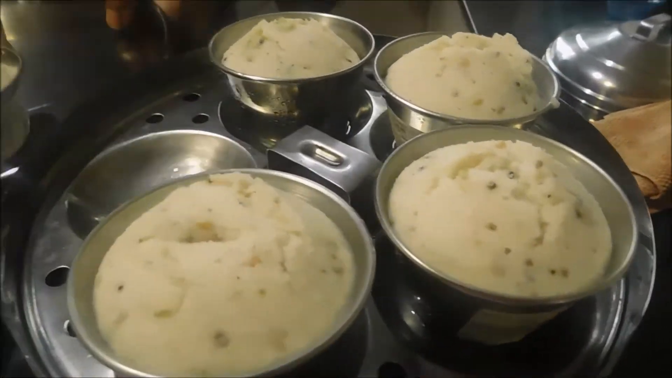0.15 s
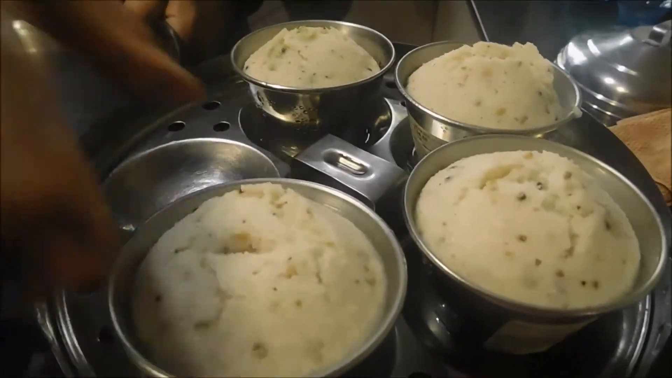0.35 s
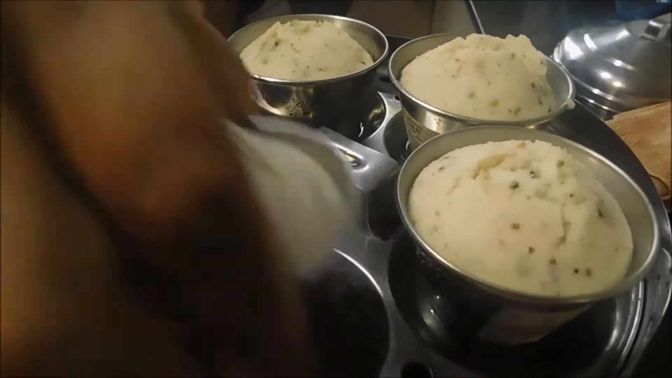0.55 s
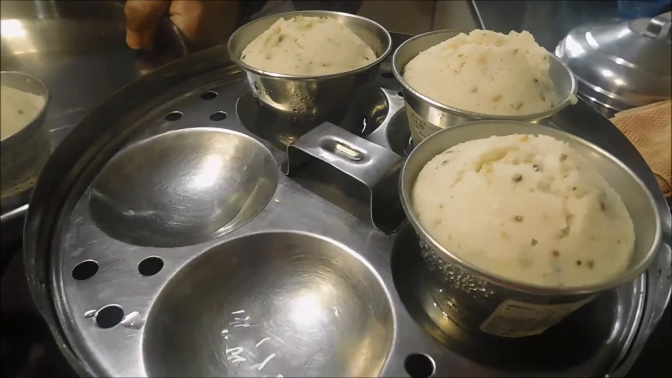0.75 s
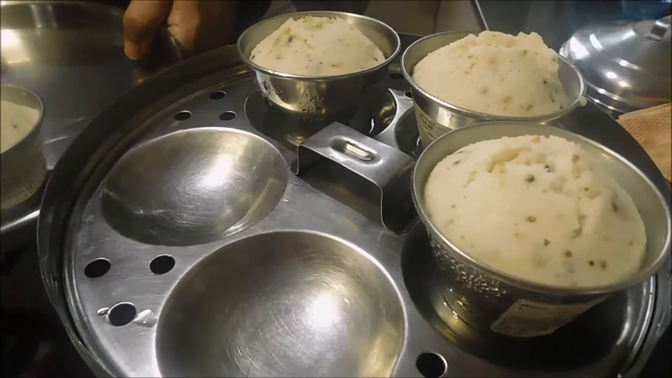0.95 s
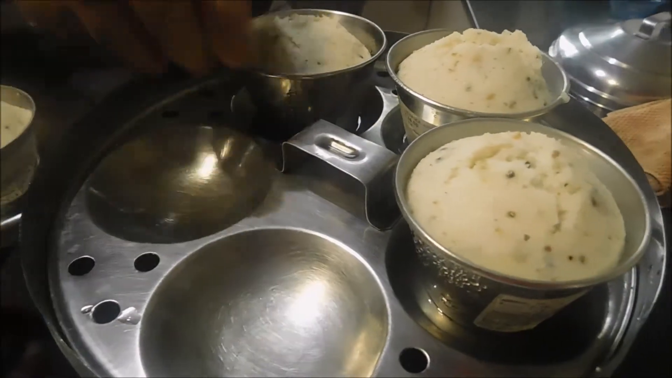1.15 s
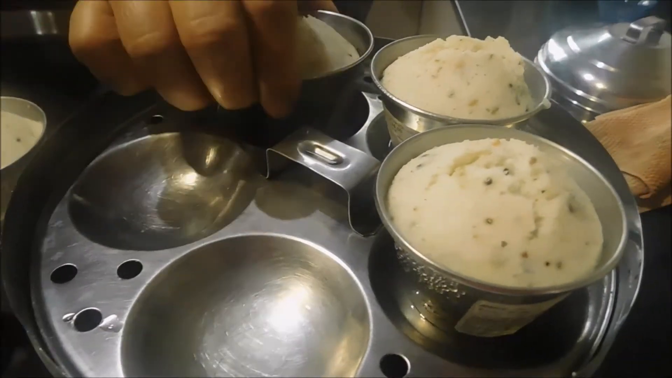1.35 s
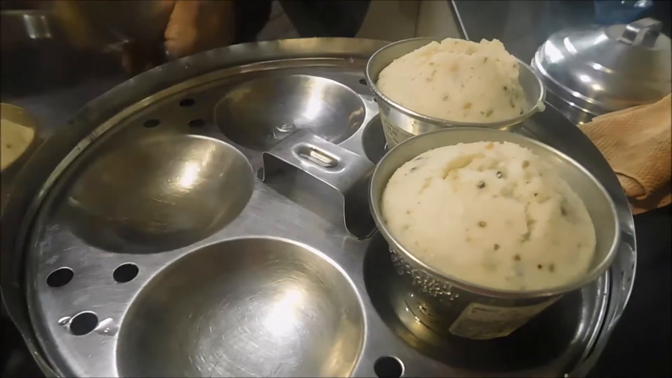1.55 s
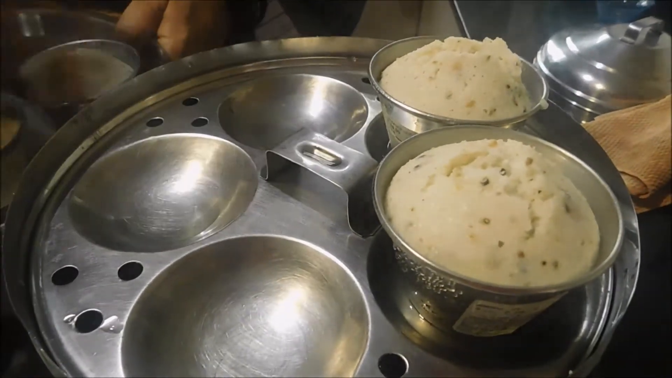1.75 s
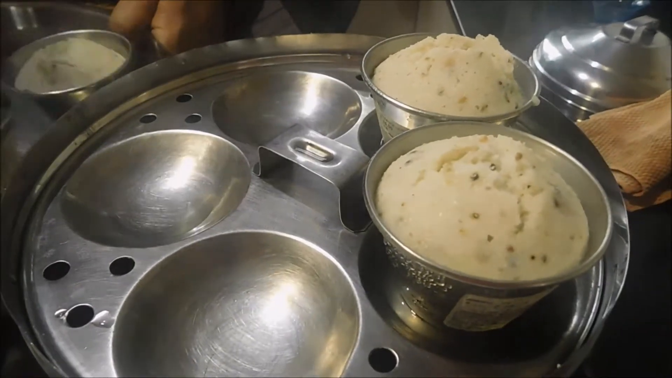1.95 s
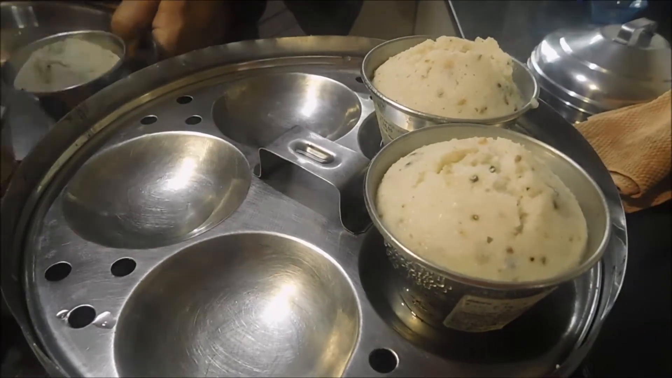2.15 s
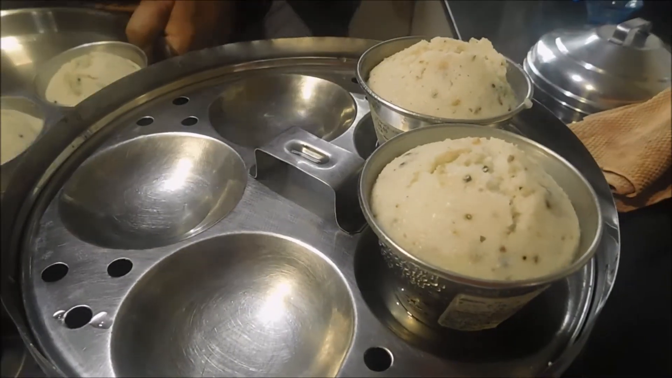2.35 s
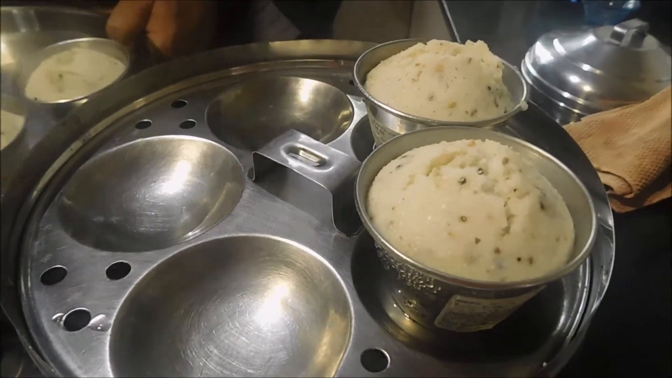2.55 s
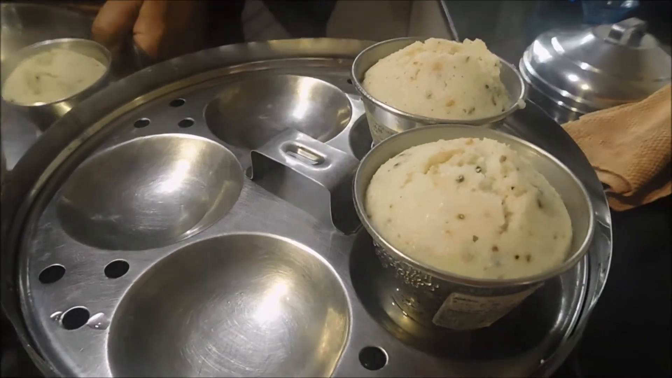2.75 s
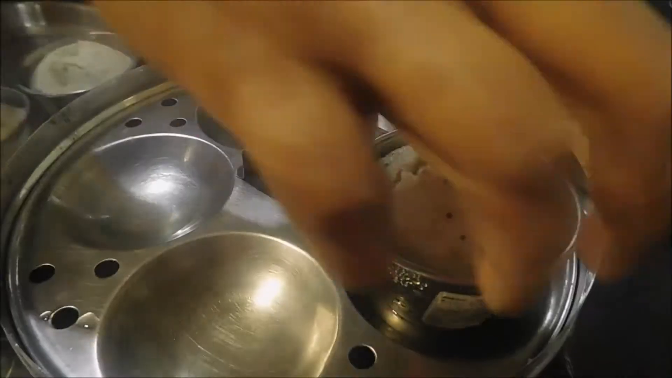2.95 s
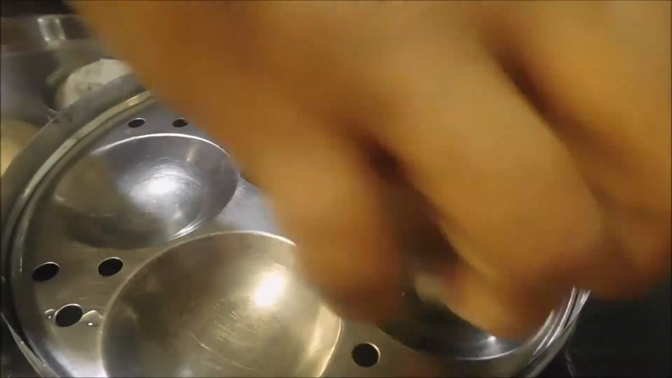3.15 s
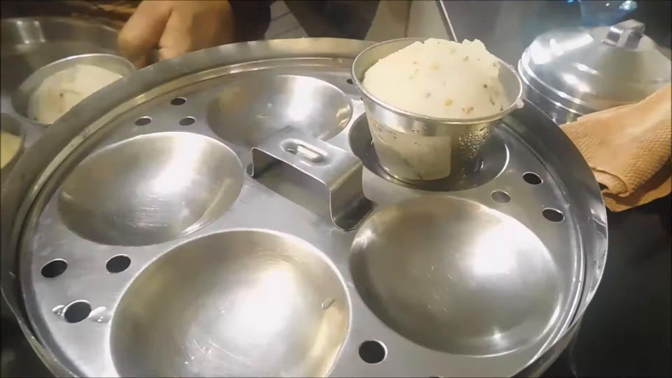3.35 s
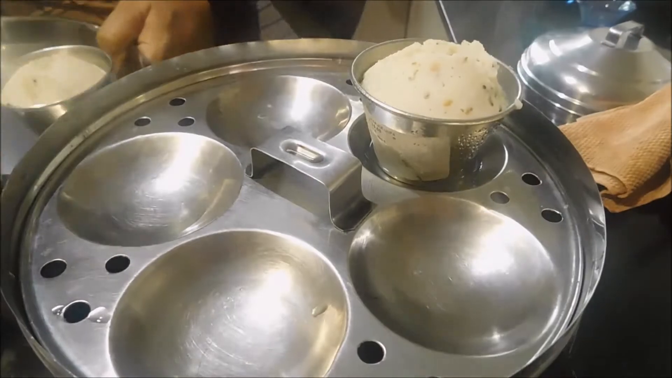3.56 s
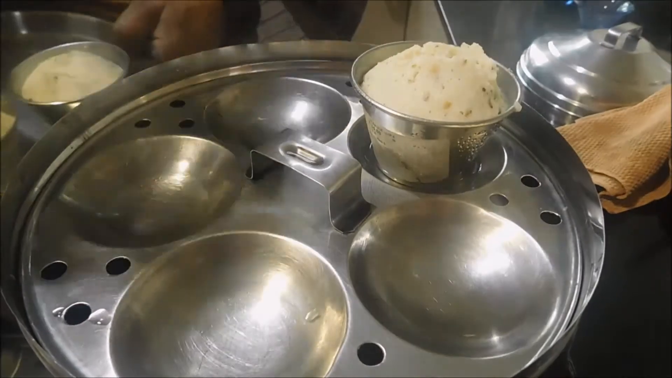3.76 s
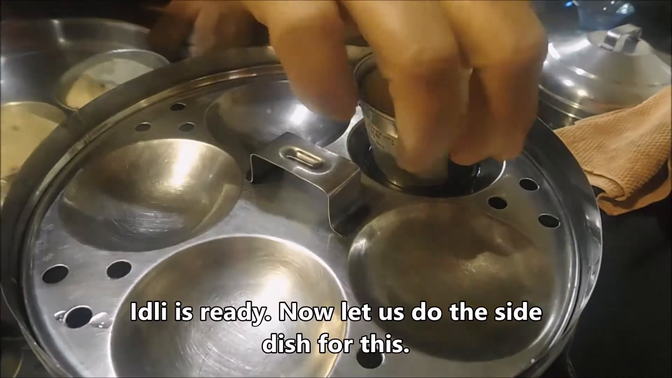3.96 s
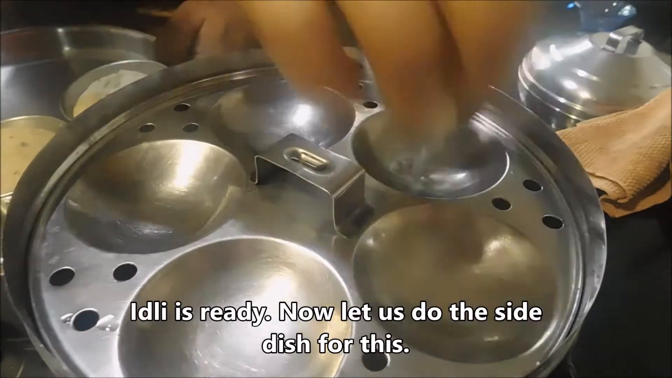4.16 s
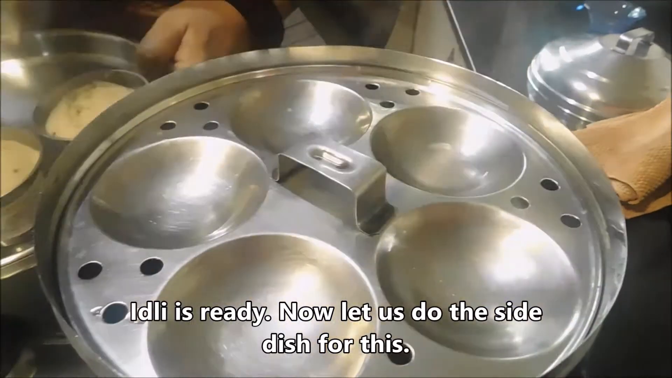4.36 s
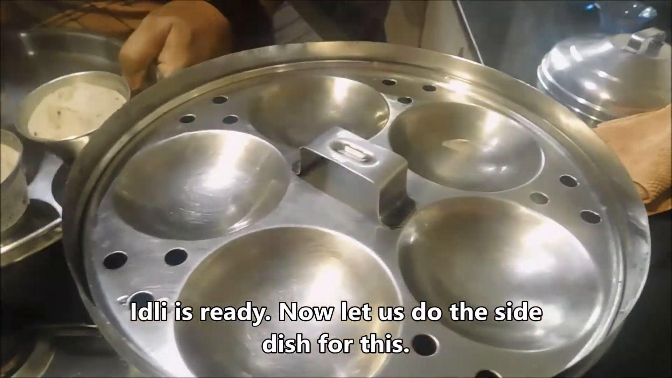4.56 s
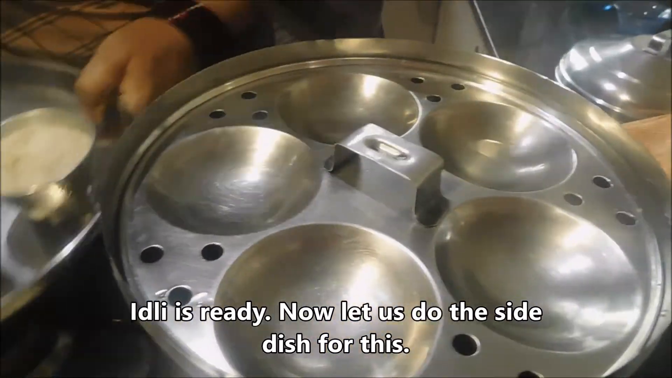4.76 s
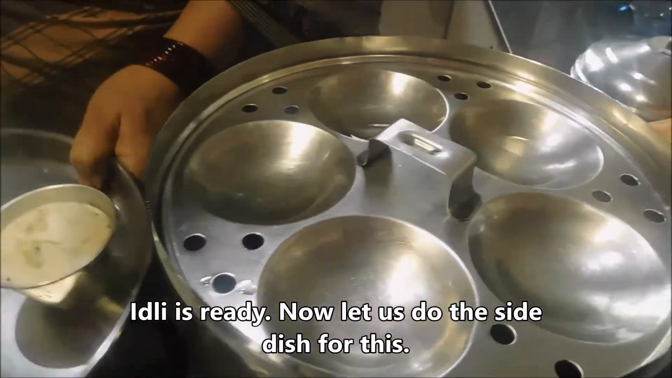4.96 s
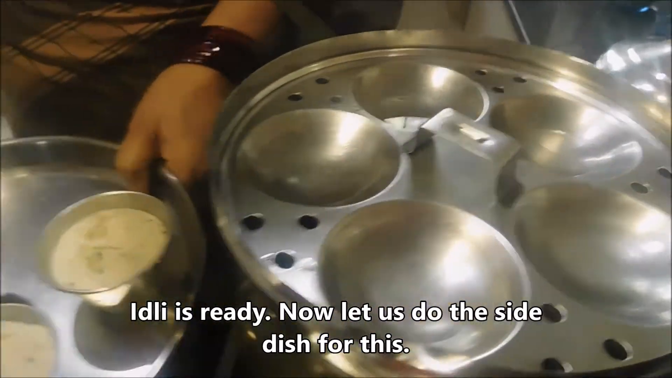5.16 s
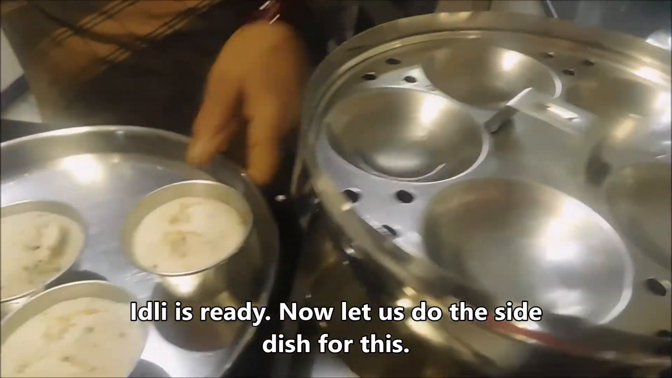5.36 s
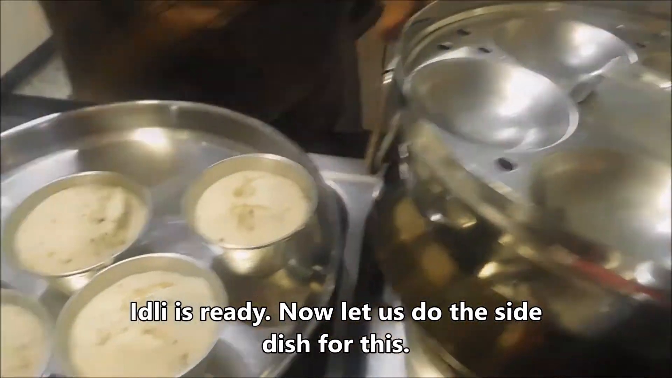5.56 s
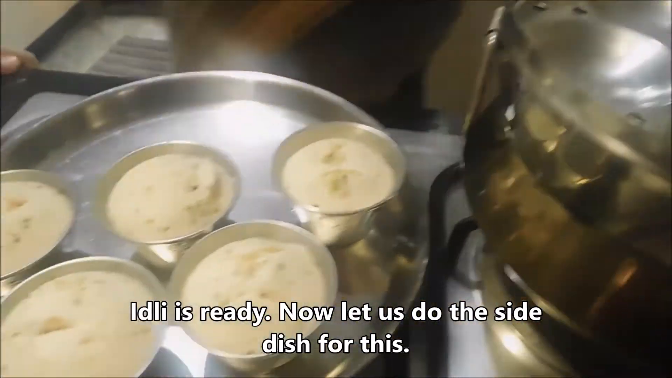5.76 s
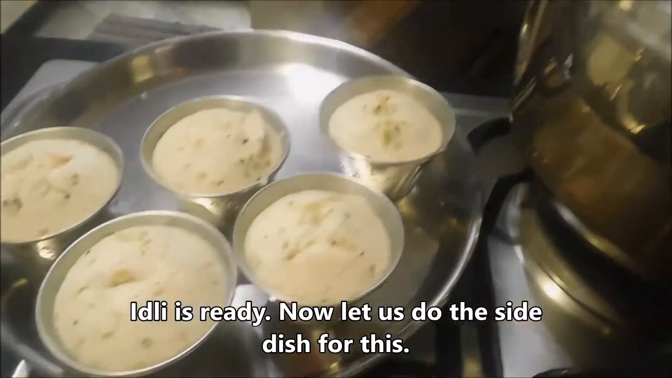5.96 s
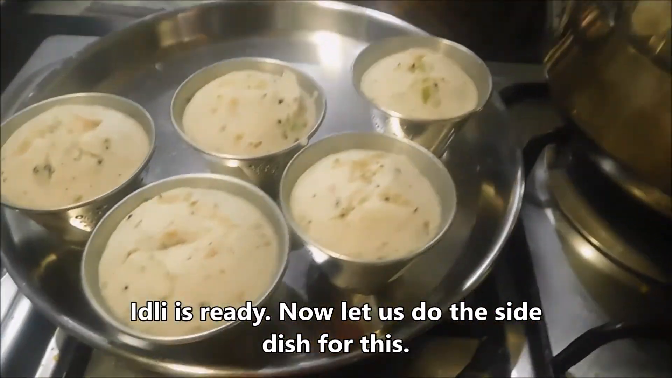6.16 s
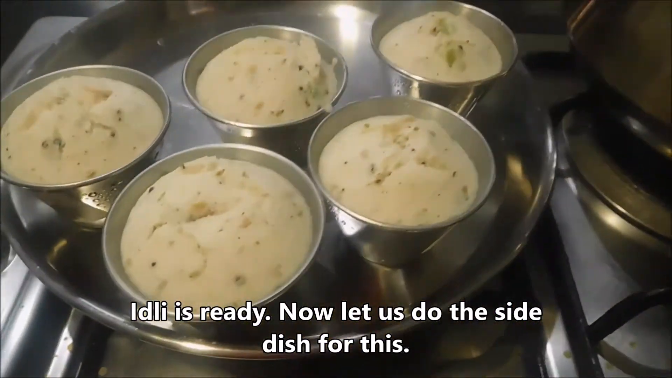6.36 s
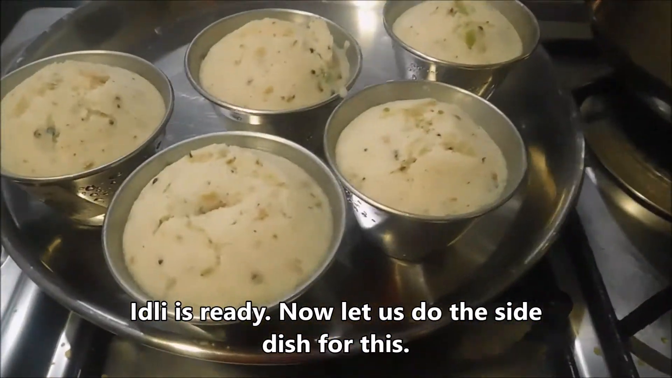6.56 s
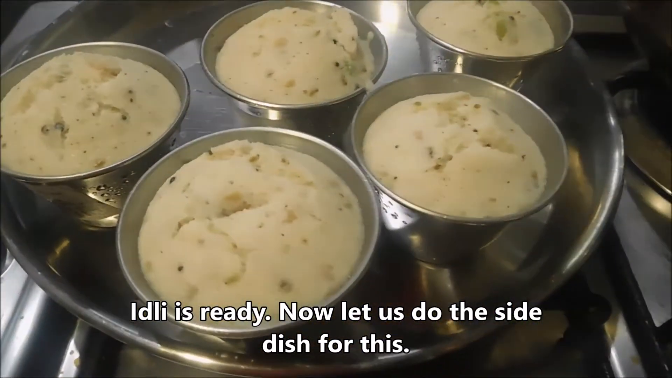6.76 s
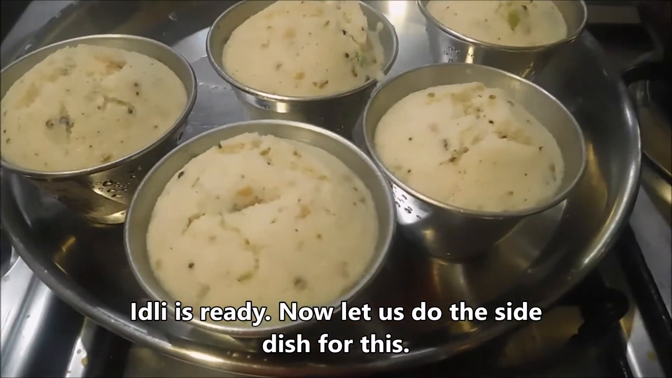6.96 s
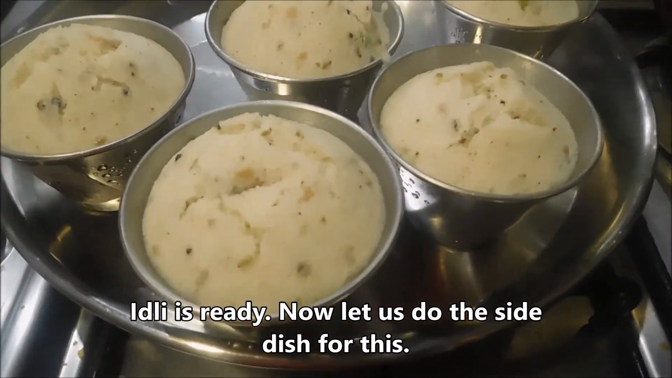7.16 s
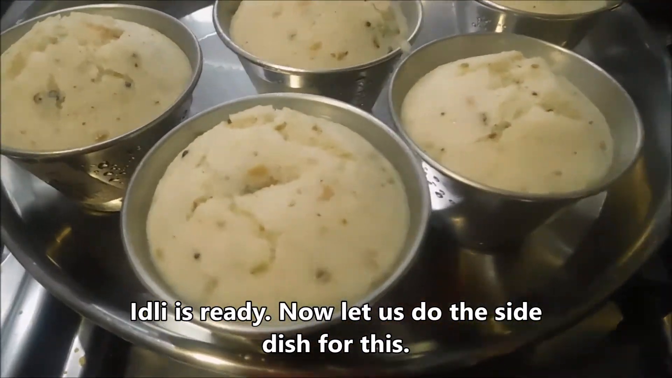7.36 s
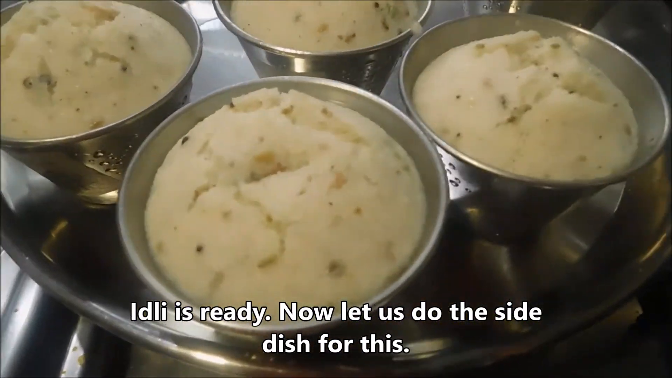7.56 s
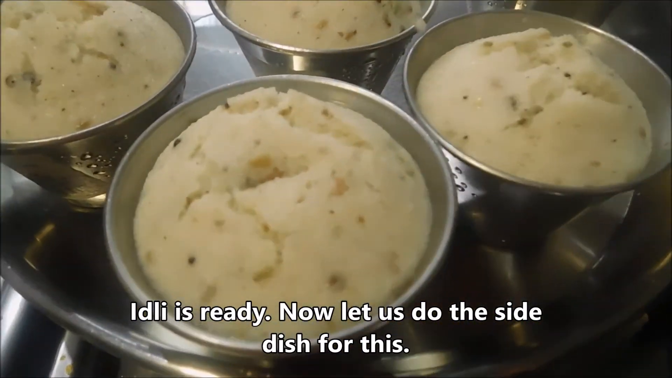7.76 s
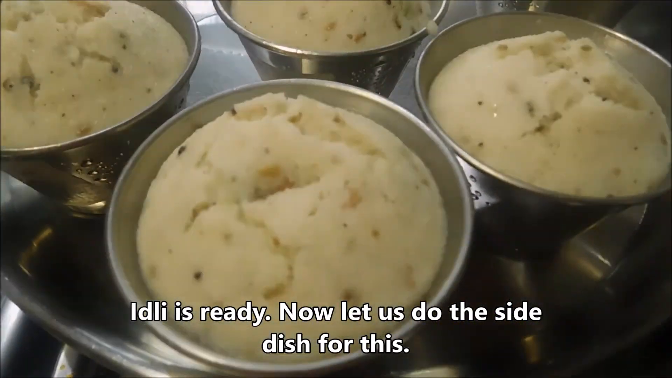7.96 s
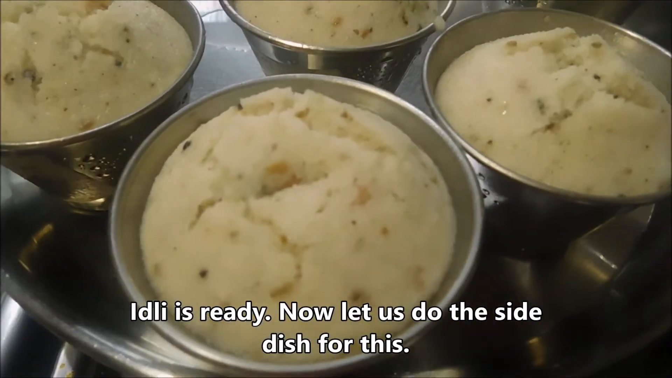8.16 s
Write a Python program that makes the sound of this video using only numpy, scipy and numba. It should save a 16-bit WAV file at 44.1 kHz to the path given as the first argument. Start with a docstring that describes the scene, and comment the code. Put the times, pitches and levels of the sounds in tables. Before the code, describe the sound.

Filled small steel cups clank one after another onto a steel tray, light scrapes between, then the tray knocks aside over faint stove hiss and ticks.

```python
"""By a kitchen stove: small steel cups full of steamed cake clank onto a steel tray, close to a phone.
Each contact is a few short-lived modes, a dense wash and a crack, re-struck as the cup rocks. Cups also
leave a steamer plate, the full tray knocks as it is dragged aside, and small ticks ring the pot's modes.
Behind are burner hiss (coloured noise) and simmering (short pings), then faint rubs and sliding tones.
Two microphone ports a few centimetres apart hear it all."""
import sys
import numpy as np
from scipy import signal
from scipy.fft import rfft, irfft, next_fast_len
from scipy.io import wavfile
from scipy.ndimage import uniform_filter1d
from numba import njit

SR = 44100
rng = np.random.default_rng(int(sys.argv[2]) if len(sys.argv) > 2 else 0)


def to_wav(s):
    """Save 16-bit WAV."""
    ch = np.atleast_2d(s).T  # columns
    pcm = np.round(np.clip(ch, -1, 1) * 32767)  # PCM
    wavfile.write(sys.argv[1], SR, pcm.astype(np.int16))


N = 362502

TOP_HZ = 15800  # hiss and rubs end here, contacts fall to a faint floor
LEAD_S = .004  # lead before each contact that holds the ringing of the zero-phase band filters
BLOW_SAMPLES = 8192
PORT = np.array([[1], [-1]])  # sign of each port about the midpoint


def undb(db):
    """Gain of a dB value."""
    return 10 ** (np.asarray(db) / 20)


def on_log(hz, table):
    """Read a (Hz, value) table on a log axis."""
    f, v = np.transpose(table)
    return np.interp(np.log(hz + 1), np.log(f + 1), v)


def over_time(table):
    """Columns of a curve table, one value a sample."""
    s, *columns = np.transpose(table)
    return [np.interp(np.arange(N) / SR, s, c) for c in columns]


def walk(rate):
    """Random levels held 1 / rate s and slewed twice; spread near 1."""
    hold = int(SR / rate)
    held = np.repeat(rng.standard_normal(N // hold + 1), hold)
    slewed = uniform_filter1d(uniform_filter1d(held, hold), hold)
    return 1.36 * slewed[:N]


def add(out, sound, s):
    """Mix a sound in at s seconds."""
    i = int(s * SR)
    part = sound[:, :N - i]
    out[:, i:i + part.shape[1]] += part


@njit
def ring(poles, gains, n):
    """Sum of decaying modes, each with its own gain and phase at the two ports."""
    out = np.zeros((2, n))
    for m in range(len(poles)):
        z = 1 + 0j
        for i in range(n):
            out[0, i] += (gains[0, m] * z).imag
            out[1, i] += (gains[1, m] * z).imag
            z *= poles[m]
            if abs(z.real) + abs(z.imag) < 1e-4:
                break
    return out


def clear_modes(modes, spot_hz, second_spot_hz, ring_factor, lag):
    """Struck sheet: modes with an antinode under the blow ring louder; the peak is set to 1."""
    hz, db, t60 = np.transpose(modes)
    chance = rng.standard_normal((3, len(hz)))
    spots_hz = np.array([[spot_hz], [second_spot_hz]])
    near = np.exp(-(np.log(hz / spots_hz) / 0.058) ** 2)
    db = db + 9 * near[0] + 6 * near[1] + 2 * chance[0]
    hz = hz * (1 + .0015 * chance[1])
    # the ports hear high modes from different parts of the sheet
    apart = np.pi * hz * lag / SR + np.clip(hz / 9000, 0, 1.5) * chance[2]
    gains = undb(db) * np.exp(-1j * PORT * apart) * rng.choice([-1, 1], len(hz))
    decay = np.log(1000) / (t60 * ring_factor * SR)
    tones = ring(np.exp(2j * np.pi * hz / SR - decay), gains, BLOW_SAMPLES)
    return tones / np.abs(tones).max()


def dense_wash(t, f, t60):
    """Weak modes too many to tell apart, as decaying noise; the high ones fade sooner."""
    mid, side = rfft(rng.standard_normal((2, BLOW_SAMPLES)))
    crowd = mid + np.clip(f / 6500, 0, 1) * side * PORT
    low = 1 / (1 + (f / 4500) ** 2)
    fade = np.log(1000) * t / t60
    return irfft(crowd * low) * np.exp(-fade) + 0.66 * irfft(crowd * (1 - low)) * np.exp(-1.3 * fade)


def rocking(chatter_db, chatter_s):
    """A first contact of 1, then small uneven bounces that die away."""
    when, size = rng.random((2, 8))
    knocks = np.zeros(BLOW_SAMPLES)
    places = (when * np.clip(chatter_s, .001, .06) * SR).astype(int)
    knocks[places] = undb(chatter_db - 18.7 * when) * (0.65 + size)
    knocks[0] = 1
    return np.roll(knocks, int(LEAD_S * SR))


# Edges between thud, hollow, body, edge and sheen. Each entry: frequency in Hz.
BAND_EDGES_HZ = (600, 1100, 2500, 6000)


def set_bands(whole, f, band_db):
    """Split a contact's spectrum into five bands and set the peak of each in dB."""
    lowpasses = [1 / (1 + (f / edge) ** 8) for edge in BAND_EDGES_HZ]
    under = np.array([0 * f] + lowpasses + [1 + 0 * f])
    bands = irfft(whole * np.diff(under, axis=0)[:, None])
    bands /= np.abs(bands).max(axis=(1, 2), keepdims=True)
    return np.tensordot(undb(band_db), bands, axes=1)


# how much of the weight reaches thud and hollow, and of the brightness edge and sheen
WEIGHT_SHARE, BRIGHT_SHARE = (0.72, 1.06), (0.84, 1.09)
SOFTENING = 0.27  # dB of crack lost per dB of weight: a heavy, flat landing is a softer contact


def blow(row, modes, colour_db, dense_db, dense_t60, crack_db, chatter_db, chatter_s, lag, low_hz):
    """One contact: modes, wash and crack, re-struck by rocking; lag in samples, t60 before ring_factor.

    colour_db is a plain blow re its body: thud, hollow, edge, sheen; low_hz is where the lows roll off.
    """
    _, body_db, weight_db, bright_db, spot_hz, second_spot_hz, ring_factor = row
    ring_factor = max(ring_factor, .05)
    t = np.arange(BLOW_SAMPLES) / SR
    f = np.arange(BLOW_SAMPLES // 2 + 1) * SR / BLOW_SAMPLES
    steel = clear_modes(modes, spot_hz, second_spot_hz, ring_factor, lag)
    steel += undb(dense_db) * dense_wash(t, f, dense_t60 * ring_factor)
    crack = rng.standard_normal(BLOW_SAMPLES) * np.exp(-t / 0.00096)
    steel += undb(crack_db - SOFTENING * weight_db) * crack
    knocks = rocking(chatter_db, chatter_s)
    # balance of the two ports over pitch
    lean_db = np.interp(np.log(f + 1), np.log([500, 4000, 8000]), [-.1, -.7, 1.1])
    whole = rfft(steel) * rfft(knocks) * undb(PORT * lean_db) / (1 + (low_hz / (f + 1)) ** 4)
    whole *= .04 + 1 / (1 + (f / TOP_HZ) ** 60)
    tilt_db = np.append(weight_db * np.array(WEIGHT_SHARE), bright_db * np.array(BRIGHT_SHARE))
    band_db = body_db + np.insert(colour_db + tilt_db, 2, 0)
    tail = np.clip((7000 - np.arange(BLOW_SAMPLES)) / 1500, 0, 1)
    return set_bands(whole, f, band_db) * tail


def blows(rows, modes, **settings):
    """Place one contact per row, its first touch at the row's start."""
    out = np.zeros((2, N))
    for row in rows:
        add(out, blow(row, modes, **settings), row[0] - LEAD_S)
    return out


# Cups landing on the tray. Each row: start in seconds, peak of the 1.1-2.5 kHz body in dB, weight that
# lifts the lows in dB, brightness that lifts the highs in dB (both before their shares), main and second
# pitch the struck spot favours in Hz, factor that scales the ring time.
SET_DOWNS = [(0.1749, -15.5, 5.5, 9.5, 1180, 3900, 0.72), (0.188, -24.5, -8, 12.5, 1176, 5260, 0.7),
             (0.2071, -17, -17, -3, 1500, 1176, 0.64), (0.2227, -26.5, -8, 8, 1480, 3720, 0.54),
             (0.9062, -17, 4, 3.5, 1300, 2180, 0.73), (0.9436, -29.5, -10, -2.5, 1650, 2190, 1.1),
             (1.7363, -16.5, 0.5, 0.5, 1440, 2500, 0.61), (1.7652, -23, -18, -11, 1400, 2470, 0.83),
             (1.7742, -22.5, -15, 3, 1490, 2520, 0.56), (2.5693, -37.5, 17.5, -6, 690, 2130, 0.48),
             (2.579, -35.5, 17, 4.5, 1650, 2690, 0.92), (2.6213, -35, 16.5, -1, 1300, 2780, 0.88),
             (2.69, -25, 12.5, 3, 1310, 2430, 0.67), (2.703, -32.5, 11, -9, 1290, 1650, 0.7),
             (3.5587, -15, 1, 3.5, 1410, 2100, 0.6), (3.571, -25.5, -6, 3, 1925, 2820, 0.7),
             (3.588, -21.5, -10, -5, 1480, 2820, 0.6), (4.554, -11, 4, 2.5, 1146, 3320, 0.63),
             (4.5962, -28.5, 14.5, 16.5, 1180, 3700, 0.46), (4.6259, -29.5, 1, 16, 1170, 3580, 0.6),
             (4.6516, -27, 2, -15, 1480, 2970, 0.69)]
# Modes of the tray. Each row: frequency in Hz, level in dB, t60 in seconds before the ring factor.
TRAY_MODES = [(430, -14, .05), (690, -6, .12), (940, -6, .12), (1060, -6, .13), (1176, 1, .17),
              (1290, -5, .14), (1483, -1, .15), (1650, -4, .13), (1925, -5, .12), (2060, -4, .14),
              (2190, -6, .13), (2430, -5, .13), (2510, -5, .13), (2820, -4, .15), (3120, -6, .13),
              (3340, -6, .13), (3720, -5, .13), (4110, -7, .12), (4370, -7, .12), (4700, -8, .12),
              (5260, -5, .13), (5500, -8, .12), (6676, -7, .14), (7230, -10, .11), (8300, -8, .11),
              (9500, -9, .12), (10600, -10, .1), (11300, -7, .12), (12700, -13, .1), (14800, -13, .1)]


def set_downs():
    """Filled cups meet the steel tray; filling and fingers damp each ring to a short clank."""
    return blows(SET_DOWNS, TRAY_MODES, colour_db=(-23.5, -16.5, 0, -5.5), dense_db=-11, dense_t60=0.37,
                 crack_db=3.5, chatter_db=-10.5, chatter_s=.022, lag=0.55, low_hz=297)


# Bumps of the dragged tray. Each row: start in seconds, body peak in dB, weight in dB, brightness in dB,
# main and second favoured pitch in Hz, factor that scales the ring time.
DRAG_KNOCKS = [(5.1123, -18, 12, 6, 920, 4070, 0.74), (5.2548, -9, -11.5, -0.5, 1556, 2640, 0.95),
               (5.3307, -11, 2.5, 4.5, 2520, 1510, 0.92)]
# Modes of the full tray. Each row: frequency in Hz, level in dB, t60 in seconds before the ring factor.
LOADED_TRAY_MODES = [(241.6, -24, 0.47), (566, -12.5, 0.2), (693, -1.5, 0.11), (949, -9, 0.19),
                     (1270, -6, 0.083), (1464, 0.5, 0.068), (1666, -2, 0.083), (1894, -2, 0.054),
                     (2120, -7, 0.11), (2486, -1.5, 0.064), (2573, -1, 0.08), (2885, -3, 0.051),
                     (3293, 8, 0.054), (4090, 8.5, 0.022), (6000, -16, 0.06), (7000, -23, .1)]


def drag_knocks():
    """The full tray bumps as it is dragged, ringing its own set of loaded modes."""
    return blows(DRAG_KNOCKS, LOADED_TRAY_MODES, colour_db=(-22.5, -15.5, -10, -22), dense_db=-12,
                 dense_t60=0.25, crack_db=-1.0, chatter_db=-12.0, chatter_s=0.017, lag=0.37, low_hz=89)


# Cups leaving the plate. Each row: start in seconds, body peak in dB, weight in dB, brightness in dB,
# main and second favoured pitch in Hz, factor that scales the ring time.
LIFTS = [(0.4437, -52.5, 13, 5, 3110, 15000, 0.55), (0.649, -37.5, 1, 3.5, 2700, 12700, 0.48),
         (0.6975, -32.5, 2, -6, 2980, 8030, 0.4), (1.3108, -37, -5, 4.5, 3400, 12700, 0.38),
         (1.376, -42, 10, -3, 3080, 8540, 0.56), (2.939, -53, 1, 5, 14800, 12700, 0.35),
         (3.1118, -33.5, -4, 5, 5500, 2120, 0.38), (3.931, -54, 6, -2, 7980, 9450, 0.63),
         (4.0062, -34, 6, 4.5, 4560, 2120, 0.4), (4.052, -31, 13, 0.5, 4260, 7850, 0.55),
         (4.147, -47, 6, 1, 3300, 8250, 0.83)]
# Modes of the plate. Each row: frequency in Hz, level in dB, t60 in seconds before the ring factor.
PLATE_MODES = [(684, -8, .12), (2120, -2, .09), (2700, -4, .11), (3090, -3, .12), (3290, -5, .12),
               (4510, -1, .11), (5500, -2, .12), (6140, -6, .16), (6840, -7, .1), (8150, -4, .11),
               (9450, -2, .13), (10570, -6, .1), (11700, -8, .08), (12650, -3, .11), (13580, -8, .1),
               (14930, -7, .07)]


def lifts():
    """Cups leave the steamer plate with light, bright contacts that ring the plate's modes."""
    return blows(LIFTS, PLATE_MODES, colour_db=(-23.5, -19, 9.5, 8), dense_db=-12, dense_t60=0.48,
                 crack_db=-2.5, chatter_db=-8.0, chatter_s=.015, lag=0.64, low_hz=210)


# Small ticks. Each row: start in seconds, body peak in dB, weight in dB, brightness in dB,
# main and second favoured pitch in Hz, factor that scales the ring time.
TICKS = [(0.5377, -37, 0, -10, 1170, 2200, 0.3), (3.0267, -40, 11, -12, 1190, 630, 0.28),
         (3.8916, -39, -6, 3, 2200, 4400, 0.3), (4.373, -46, 13.5, 2, 622, 2190, 0.37),
         (4.7434, -43, 17.5, 4, 630, 2210, 0.41), (4.78, -35, -4, 0, 1190, 2250, 0.24),
         (5.8694, -44.5, 16, 1, 490, 2200, 0.77), (6.0975, -42.5, 4.5, 0, 633, 2200, 0.52),
         (6.339, -36, 2.5, -11, 644, 2200, 0.88), (6.3994, -31, -17, 17, 1960, 3380, 0.08),
         (6.691, -36, -19, 24, 1960, 2200, 0.21), (6.9152, -40, -4, 14, 1130, 3440, 0.73),
         (7.5733, -35.5, -7, 19.5, 1950, 3380, 0.22), (7.8194, -47, 17, 2, 630, 3280, 0.42),
         (8.1853, -39, 1, 8, 2180, 3380, 0.89)]
# Modes of the pot, also rung by the simmer. Each row: frequency in Hz, level in dB, t60 in seconds before
# a tick's ring factor or the damping of the water.
POT_MODES = [(489, -17.5, 0.32), (621, -3, 0.2), (1150, -10.5, 0.34), (1980, -5.5, 0.094),
             (2180, 0.5, 0.13), (3390, -2, 0.12), (4380, 3, 0.051)]


def ticks():
    """Small ticks ring the pot's modes."""
    return blows(TICKS, POT_MODES, colour_db=(-14.5, -16.5, -10, -28.5), dense_db=-9, dense_t60=0.36,
                 crack_db=1.5, chatter_db=-9.5, chatter_s=0.0038, lag=2.2, low_hz=220)


def simmer(rate, db, spread_db):
    """Bubbles burst against the pot, rate a second, and ring its modes for a moment."""
    t = np.arange(2000) / SR
    rise = 1 - np.exp(-t / 0.0054)
    out = np.zeros((2, N))
    for when, pick, size, bend in rng.random((int(rate * N / SR), 4)):
        hz, mode_db, t60 = POT_MODES[int(pick * len(POT_MODES))]
        tone = np.sin(2 * np.pi * hz * (.97 + 0.0565 * bend) * t)
        fade = np.exp(-np.log(1000) * t / (0.58 * t60))  # the water damps the ring
        ping = tone * fade * rise
        level = undb(db + mode_db - spread_db * np.log(size + 0.021))
        add(out, level * np.array([.9 * ping, ping]), when * N / SR)
    return out


# Likeness of the two ports. Each row: frequency in Hz, likeness before a small offset and a clip to 0.05-1.
PORT_LIKENESS = [(60, 0.85), (130, 0.91), (290, 0.81), (640, 0.87), (1410, 0.85), (3100, 0.73),
                 (6820, -0.15), (15000, -0.12)]


def hiss(colour, peaks, lag, flicker_db):
    """Coloured noise, alike at both ports in the bass; octave bands flicker on their own. RMS 1."""
    n = next_fast_len(N, True)
    f = np.arange(n // 2 + 1) * SR / n
    peaks_db = sum(g / (1 + (2 * (f - hz) / w) ** 2) for hz, w, g in peaks)
    db = on_log(f, colour) + peaks_db
    alike = np.clip(on_log(f, PORT_LIKENESS) + 0.075, .05, 1)
    both, left, right = rfft(rng.standard_normal((3, n)))
    late = np.exp(-2j * np.pi * f * lag / SR)  # lag in samples, at the first port
    shared = np.sqrt(alike) * both * np.array([late, late ** 0])
    pair = shared + np.sqrt(1 - alike) * np.array([left, right])
    pair *= undb(db) * (f < TOP_HZ) / (1 + (34 / (f + 1)) ** 4)
    octave = np.clip(np.log2(f / 350 + 1e-9), 0, 5)
    out = np.zeros((2, N))
    for k in range(6):
        band = irfft(pair * np.clip(1 - abs(octave - k), 0, 1), n)[:, :N]
        out += band * undb(flicker_db * walk(14))
    return out / out.std()


# Hiss over time. Each row: time in seconds, level in dB before a 1.02 dB trim, share of the near colour 0-1.
HISS_CURVE = [(0.0, -45.5, 0.46), (2.61, -46, 0.74), (2.77, -47.5, 0.54), (3.32, -50, 0.6),
              (5.3, -49.5, 0.41), (7.16, -49.5, 0.26), (8.22, -48, 0.37)]
# Hiss with the phone facing the stove, then turned away. Each row: frequency in Hz, relative level in dB per Hz.
NEAR_COLOUR = [(15, -38), (25, 0.5), (241, -8.5), (391, -47), (424, -42), (512, -7), (688, -3.5),
               (831, -10), (1180, -6.5), (1630, -8), (2650, -0.5), (3660, -5), (4300, 16), (8220, -37),
               (15700, -13.5)]
FAR_COLOUR = [(15, -40), (25, 3), (75, -12), (199, -4), (380, -11), (447, -7), (652, -6), (746, -7.5),
              (854, -11.5), (1680, -5.5), (2140, -10), (3030, -5.5), (4080, -2.5), (7180, -12),
              (15700, -20.5)]
# The pot's walls colour the hiss, facing and away. Each row: frequency in Hz, width in Hz, boost in dB.
NEAR_PEAKS = [(613, 63, -2), (1274, 480, 6.5), (2710, 110, 3.5), (4446, 1120, -25.5), (8780, 4550, 15.5),
              (12000, 860, 7)]
FAR_PEAKS = [(449, 17, 7.7), (578, 63, 4.3), (1240, 250, 1.6), (2300, 150, 7.6), (4560, 190, 4.7),
             (11900, 890, 6.4)]


def stove():
    """Burner and pot: the hiss changes level, colour and port balance as the phone turns; simmer on top."""
    level_db, near = over_time(HISS_CURVE)
    near = np.clip(near, 0, 1)
    facing = hiss(NEAR_COLOUR, NEAR_PEAKS, lag=0.96, flicker_db=2.0) * undb([[-.3], [.3]])
    away = hiss(FAR_COLOUR, FAR_PEAKS, lag=2.86, flicker_db=2.5) * undb([[-.8], [.8]])
    blend = np.sqrt(near) * facing + np.sqrt(1 - near) * away
    return undb(level_db + 1.02) * blend + simmer(rate=71, db=-51.5, spread_db=4)


# Fingers and steel rubbing, and a brief high hiss. Each row: start in seconds, length in seconds,
# centre in Hz, width in Hz, RMS level in dB.
RUBS = [(4.845, 0.14, 3130, 4520, -51), (5.23, .012, 5500, 5000, -56), (5.855, 0.066, 12000, 6070, -62),
        (6.09, 0.095, 14000, 2500, -56), (8.131, 0.085, 3000, 2500, -54.5)]


def rubs():
    """Short rubs: band-passed noise with a fast uneven level under a smooth swell."""
    out = np.zeros((2, N))
    for s, length, hz, width, db in RUBS:
        n = int(length * SR)
        grains = rng.standard_normal((2, n)) * undb(2.5 * walk(163)[:n]) * np.hanning(n)
        band_hz = [hz - width / 2, min(hz + width / 2, TOP_HZ)]
        sos = signal.butter(2, band_hz, "band", fs=SR, output="sos")
        rub = signal.sosfilt(sos, grains[0] + 0.41 * grains)  # mostly shared by the ports
        add(out, undb(db) * rub / rub.std(), s)
    return out


# A faint low tone. Each row: start in seconds, length in seconds, starting pitch in Hz, peak level in dB.
TONES = [(2.799, 0.3, 433.6, -60.5), (6.98, 0.1, 474, -56), (7.218, 0.33, 443, -60.5)]
TONE_SLIDE_HZ_PER_S, TONE_FADE_S = 96, 0.042


def sliding_tones():
    """A faint low sine slides upward, faded at both ends and equal at the two ports."""
    out, t = np.zeros((2, N)), np.arange(N) / SR
    for s, length, hz, db in TONES:
        edge = np.clip(np.minimum(t - s, s + length - t) / TONE_FADE_S, 0, 1)
        cycles = (hz + TONE_SLIDE_HZ_PER_S * (t - s) / 2) * (t - s)
        out += edge * undb(db) * np.sin(2 * np.pi * cycles)
    return out


def scene():
    """Steel close by, over the stove, with faint rubs and tones."""
    steel = set_downs() + drag_knocks() + lifts() + ticks()
    return steel + stove() + rubs() + sliding_tones()


def record(dry):
    """Nothing sounds above 16.9 kHz: a steep low-pass."""
    return signal.sosfilt(signal.ellip(10, .2, 80, 16900, fs=SR, output="sos"), dry)


dry = scene()
out = record(dry)
to_wav(out)
```